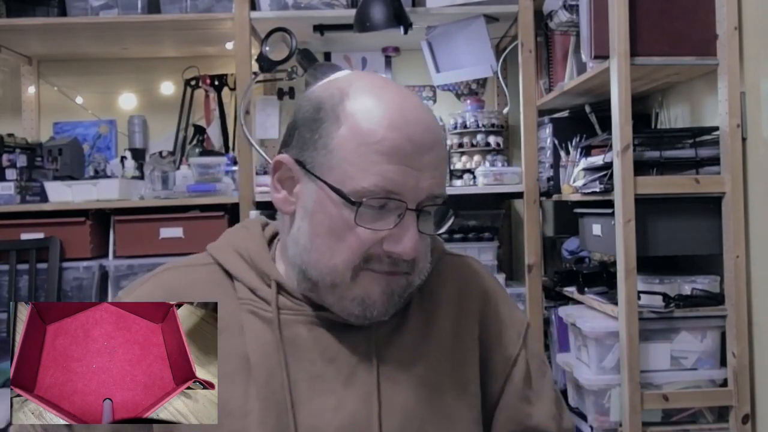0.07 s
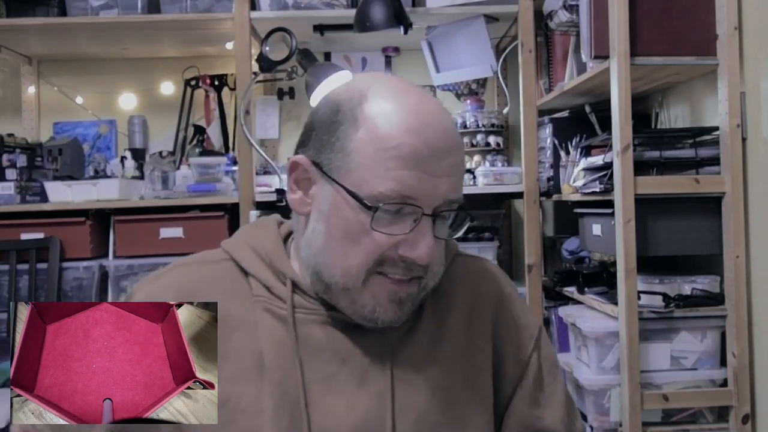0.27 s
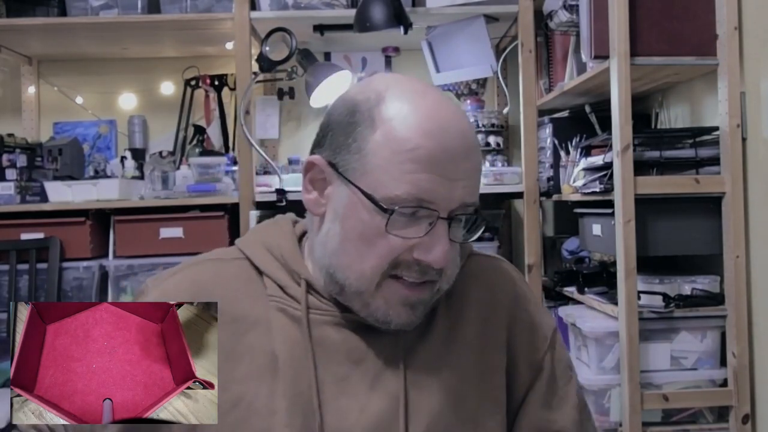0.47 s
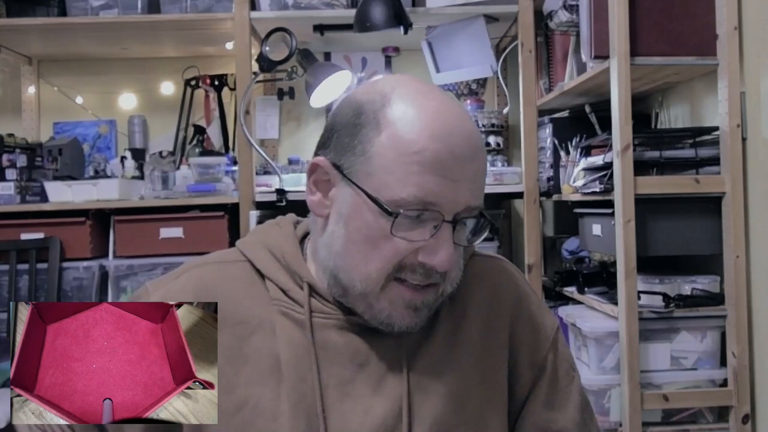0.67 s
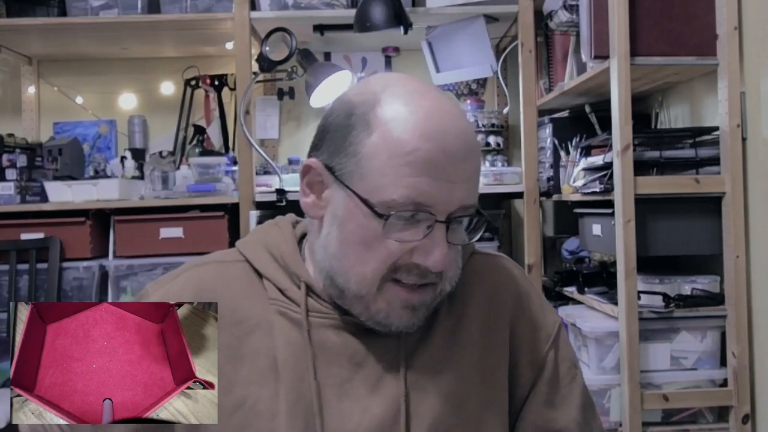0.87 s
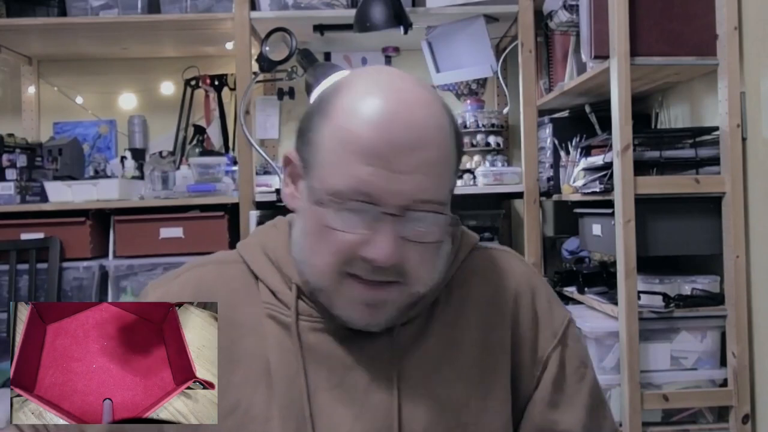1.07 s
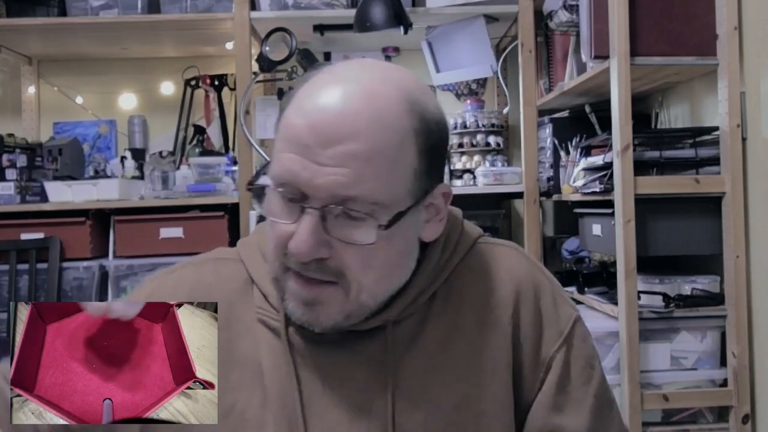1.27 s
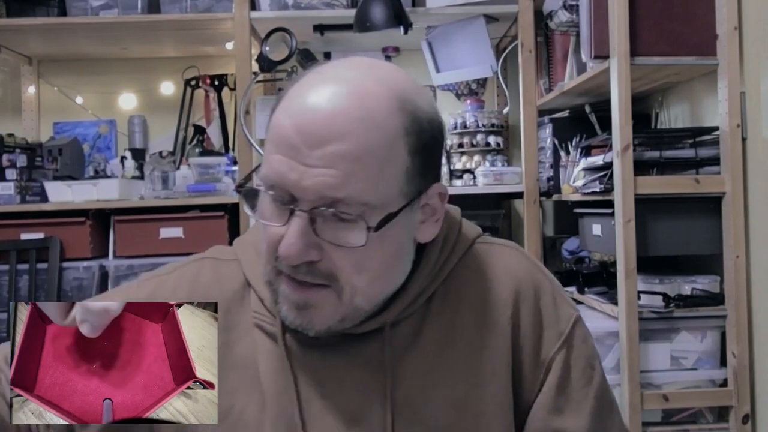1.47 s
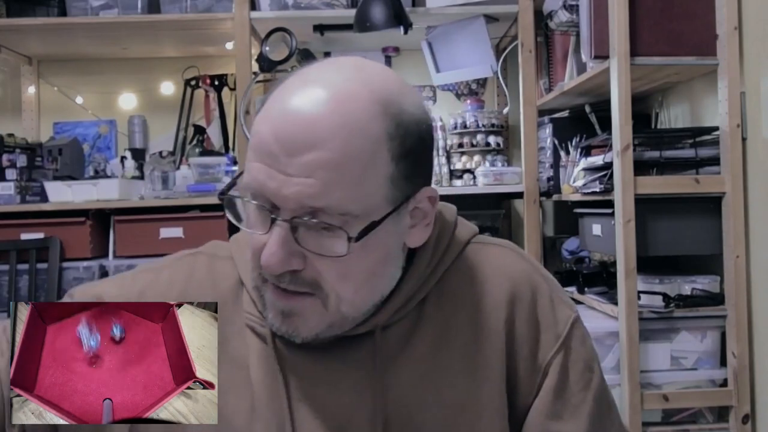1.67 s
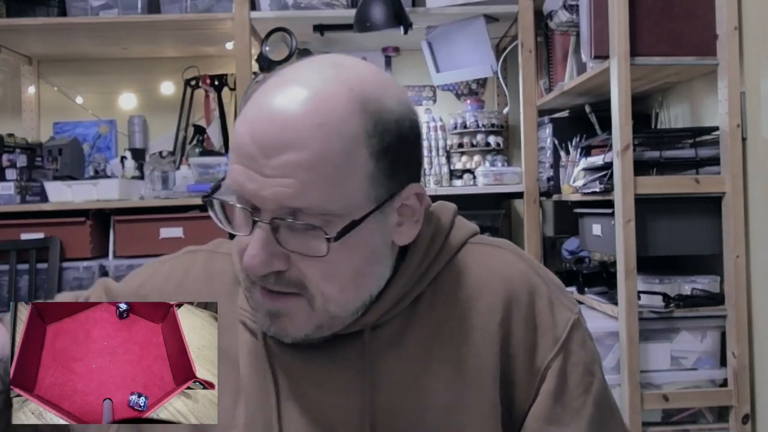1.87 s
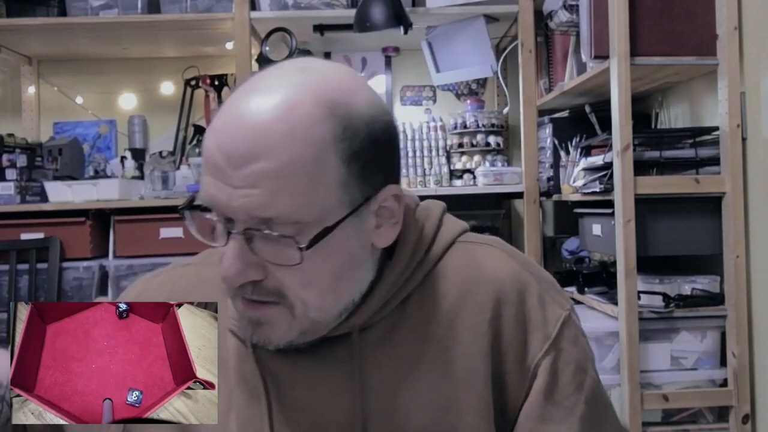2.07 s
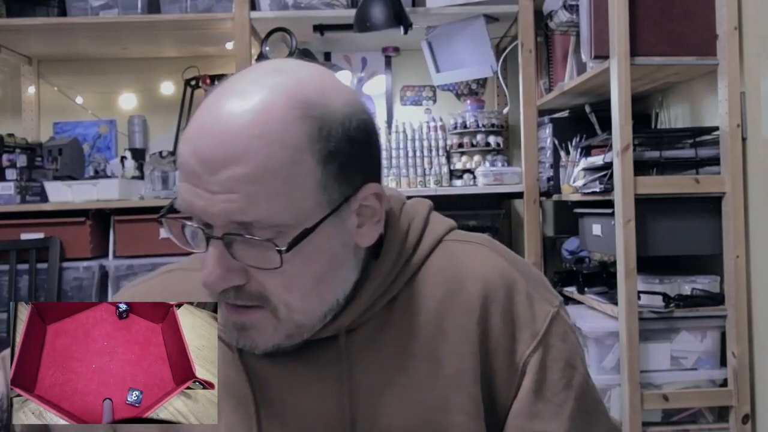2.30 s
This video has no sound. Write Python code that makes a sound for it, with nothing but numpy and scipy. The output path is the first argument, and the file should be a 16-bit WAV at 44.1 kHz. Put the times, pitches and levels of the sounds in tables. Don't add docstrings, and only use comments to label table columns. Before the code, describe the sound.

Two plastic dice clack in a cupped hand, then thud and tumble into a felt-lined tray

```python
import sys
import numpy as np
from scipy import signal
from scipy.fft import rfft, irfft
from scipy.io import wavfile

SR = 44100
rng = np.random.default_rng(int(sys.argv[2]) if len(sys.argv) > 2 else 0)


def ratio_of_db(decibels):
    return 10 ** (np.asarray(decibels, float) / 20)


def put_to_file(sound):
    columns = np.atleast_2d(sound).T
    safe = np.clip(columns, -1, 1)
    whole_steps = np.round(safe * 32767)
    wavfile.write(sys.argv[1], SR, whole_steps.astype(np.int16))


N = 103061
PAD = SR // 4

# pitch_hz, level_db, t60_s (time to fade by 60 dB)
DIE_MODES = [(1200, -25, 0.012), (2134, -8.5, 0.007), (2850, -15, 0.0052), (4000, -5, 0.0084),
             (4700, -7, 0.0044), (5630, -4, 0.0062), (6890, -3.5, 0.0074), (8160, -2.5, 0.0057),
             (9440, -0.5, 0.0055), (10520, -2.5, 0.0036), (11970, -1.5, 0.005), (14100, -9, 0.0032),
             (14950, -13, 0.0025)]
DIE_HARD_ABOVE_HZ, DIE_CONTACT_S = 7500, 0.00022


def dice():
    # start_s, peak_db, loudest_hz, palm_hollow_db, hardness_db (of the top notes)
    clacks = [(0.0832, -28, 3900, 9, -12), (0.1454, -21.5, 5500, 2.2, 1), (0.171, -21.5, 5740, 0.5, -2),
              (0.1868, -30, 4400, 6, 4.5), (0.265, -31, 4500, 10.5, -6), (0.2872, -20.5, 3620, 0.3, -16),
              (0.4712, -25, 4260, 9.2, -24), (0.4952, -17.5, 3730, 4.2, -18), (0.5691, -20, 4400, -1.5, -3),
              (0.5784, -19, 5800, -1.2, 2.5), (0.6083, -18.5, 4430, -3.2, -2.5),
              (0.7128, -17.5, 3630, -4.5, 3.5), (0.7842, -14, 6360, -1.7, -4.5),
              (0.9113, -20, 7050, 0.8, 1.5), (0.9916, -25, 5000, 1, 4.5), (1.001, -20, 5100, -1.2, 1.5),
              (1.1099, -19.5, 7500, 0.3, -3), (1.168, -17.5, 7200, -12, -3.5), (1.212, -25, 5100, 2, -3),
              (1.2613, -25.5, 4880, 4, -14), (1.3495, -31, 4000, 0.3, -3.5), (1.3767, -26, 3940, -18, 0.5),
              (1.6604, -30.5, 6620, -6, 10)]
    # start_s, peak_db, loudest_hz
    rebounds = [(0.0893, -21.5, 4000), (0.1095, -30, 4500), (0.1145, -38, 4000), (0.1404, -50, 5500),
                (.1502, -26, 5000), (0.189, -32, 5000), (0.2188, -37, 4000), (0.23, -33, 2430),
                (0.2937, -24.5, 4000), (0.3035, -43, 4000), (0.389, -31, 5000), (.3955, -41, 8500),
                (0.401, -36.5, 10500), (0.41, -41.5, 3800), (0.505, -33, 4000), (0.5204, -40, 4000),
                (0.6131, -27.5, 4500), (0.7213, -24.5, 5000), (0.791, -24.5, 6500), (.8049, -34, 3500),
                (.8088, -32, 4500), (0.948, -30, 5500), (1.1167, -30.5, 4000), (1.141, -39.5, 5000),
                (1.1745, -25.5, 6500), (1.1772, -23.5, 6800), (1.1922, -39, 6500), (1.3712, -38, 4100)]
    # start_s, peak_db, loudest_hz
    soft_ticks = [(1.4234, -36, 4100), (1.4711, -29, 4700), (1.509, -37, 4700), (1.5216, -37, 4440),
                  (1.5289, -41, 4700), (1.5508, -44.5, 4700)]
    # start_s, length_s, level_db, loudest_hz
    grinds = [
        (.951, .028, -31, 6000),
        (1.373, .02, -33, 4200),
        (1.178, .018, -33, 6800),
    ]
    rebound_palm_db, rebound_hard_db = -1.5, -3.5
    soft_palm_db, soft_hard_db = -4.5, -31
    grind_clicks_per_s, grind_trim_db = 4300, 5
    lag_s, trim_db = 0.001, -4.5

    blows = [(-0.025, -16.5, 5000, 0, 0)]
    blows += list(clacks)
    blows += [(0.384, -15, 4600, -2.5, 3), (0.3883, -25, 5300, -2.5, -6.0)]
    blows += [(*row, rebound_palm_db, rebound_hard_db) for row in rebounds]
    blows += [(*row, soft_palm_db, soft_hard_db) for row in soft_ticks]
    for start_s, length_s, level_db, loudest_hz in grinds:
        chance, size = rng.random((2, 80))
        gaps_s = -np.log(chance) / grind_clicks_per_s
        places = np.cumsum(gaps_s) / length_s
        for place, click_size in zip(places, size):
            if place < 1:
                swell = np.sqrt(place) * (1 - place)
                click_db = level_db + grind_trim_db + 20 * np.log10(swell * click_size)
                blows.append((start_s + length_s * place, click_db, loudest_hz, rebound_palm_db, rebound_hard_db))

    start_s, peak_db, loudest_hz, palm_db, hard_db = np.transpose(blows)
    ringing = strike(start_s + lag_s, peak_db + trim_db, loudest_hz, palm_db, 3300,
                     hard_db, DIE_HARD_ABOVE_HZ, DIE_MODES, DIE_CONTACT_S)
    low_cut = signal.butter(2, 1000, "high", fs=SR, output="sos")
    return signal.sosfilt(low_cut, ringing)


def tray():
    # start_s, peak_db, loudest_hz, hardness_db
    thuds = [
        (1.781, -14.5, 872, 6.5),
        (1.806, -14, 957, 1.5),
        (1.819, -32, 1220, 2),
        (1.833, -25.5, 528, -22),
        (1.864, -22, 920, 3),
        (1.886, -26, 266, 1),
        (1.93, -29.5, 366, -5),
        (1.956, -24.5, 910, -3.5),
        (1.972, -34.5, 361, -9),
        (2.072, -49, 357, -6),
    ]
    # pitch_hz, level_db, t60_s
    tray_modes = [(115.7, -21.5, 0.067), (169.3, -20, .12), (260, -14, 0.057), (352, -10.5, 0.056),
                  (497.5, -9, 0.044), (584, -9.5, 0.032), (695, -11.5, 0.025), (771, -8, 0.0324),
                  (850, -1.5, 0.016), (978, -4.5, 0.018), (1142, -2, 0.015), (1359, -11, 0.018),
                  (1780, -8.5, 0.0095), (2640, -16.5, 0.0037)]
    lag_s, thud_trim_db, tick_db = 0.0012, -5, -35.5

    start_s, peak_db, loudest_hz, hard_db = np.transpose(thuds)
    flat_db = 0 * start_s
    body = strike(start_s + lag_s, peak_db + thud_trim_db, loudest_hz, flat_db, 0,
                  hard_db, 1600, tray_modes, 0.00048)
    tick = strike(start_s + lag_s, peak_db + tick_db + hard_db, loudest_hz, flat_db, 0,
                  flat_db, DIE_HARD_ABOVE_HZ, DIE_MODES, DIE_CONTACT_S)
    felt_dulling = signal.butter(2, 6600, fs=SR, output="sos")
    return signal.sosfilt(felt_dulling, body) + tick


def strike(start_s, peak_db, loudest_hz, low_db, low_below_hz, hard_db, hard_above_hz, modes, contact_s):
    focus_db, focus_octaves = 5, 0.3
    scatter_db, detune_share = 2.0, 0.042
    longest_ring_cycles, hard_edge_octaves = 24, 0.3

    out = np.zeros(N + PAD + SR)
    t = np.arange(SR // 8) / SR
    hz, level_db, t60_s = np.transpose(modes)[:, :, None]
    t60_s = np.where(hz > hard_above_hz, np.minimum(t60_s, longest_ring_cycles / hz), t60_s)
    top_share = np.clip(1 + np.log2(hz / hard_above_hz) / hard_edge_octaves, 0, 1)
    soft_start = (1 - np.exp(-t / contact_s)) ** 2
    signs = (-1) ** np.arange(len(modes))[:, None]
    luck = rng.standard_normal((len(start_s), 2, len(modes), 1))
    for k in range(len(start_s)):
        octaves_away = np.log2(hz / loudest_hz[k])
        colour_db = focus_db * np.exp(-(octaves_away / focus_octaves) ** 2)
        colour_db = colour_db + scatter_db * luck[k, 0]
        colour_db = colour_db + low_db[k] * (hz < low_below_hz) + hard_db[k] * top_share
        loudness = ratio_of_db(peak_db[k] + level_db + colour_db - 60 * t / t60_s)
        tuned_hz = hz * (1 + detune_share * luck[k, 1])
        rings = loudness * np.sin(2 * np.pi * tuned_hz * t) * soft_start * signs
        i = int(start_s[k] * SR) + PAD
        out[i:i + len(t)] -= rings.sum(axis=0)
    return out[:N + PAD]


def sway():
    start_s, pitch_hz, peak_s, level_db = 1.7876, 34.7, 0.13, -30
    t = np.maximum(np.arange(N) / SR - start_s, 0)
    swell = t / peak_s * np.exp(1 - t / peak_s)
    return ratio_of_db(level_db) * swell * np.sin(2 * np.pi * pitch_hz * t)


def room(source):
    # pitch_hz, t60_s
    room_t60 = [(150, 0.61), (600, 0.32), (2000, 0.31), (5000, 0.29), (9000, 0.33), (15000, 0.25)]
    grain_db, grain_hz, rise_s = 2.5, 250, 0.0014
    t = np.arange(SR // 2) / SR
    edges_hz = 100 * 2 ** np.arange(0, 7.6, .5)
    echo = np.zeros(len(t))
    for low_hz, high_hz in zip(edges_hz, edges_hz[1:]):
        band_pass = signal.butter(2, [low_hz, high_hz], "band", fs=SR, output="sos")
        band = signal.sosfilt(band_pass, rng.standard_normal(len(t)))
        fade_db = -60 * t / at_hz(room_t60, np.sqrt(low_hz * high_hz))
        echo += band * ratio_of_db(grain_db * drift(grain_hz, count=len(t)) + fade_db)
    echo *= 1 - np.exp(-(t / rise_s) ** 2)
    echo /= np.sqrt(np.sum(echo ** 2))
    return signal.fftconvolve(source, echo)[:len(source)]


def air():
    # pitch_hz, level_db (per Hz)
    air_colour = [(70, -3.5), (150, -6.5), (400, -6), (800, -6.5), (1300, -4), (2200, -11.5), (5000, -23),
                  (15000, -33.5)]
    # pitch_hz, level_db (rms)
    fan = [
        (192, -72),
        (860, -70),
        (1137, -77),
        (1680, -79),
    ]
    hiss_db, rumble_db, rumble_low_hz, rumble_high_hz = -64, -66.5, 5.1, 48
    wobble_db, wobble_hz, wander_hz = 2.0, 8, 1.3

    hz = np.maximum(np.fft.rfftfreq(N, 1 / SR), 1)
    hiss_gain = ratio_of_db(at_hz(air_colour, hz)) * (hz > 40)
    rumble_gain = 1 / (1 + (hz / rumble_high_hz) ** 6) / (1 + (rumble_low_hz / hz) ** 4)
    out = ratio_of_db(hiss_db) * coloured_noise(hiss_gain) + ratio_of_db(rumble_db) * coloured_noise(rumble_gain)
    for pitch_hz, level_db in fan:
        turns = np.cumsum(pitch_hz + wander_hz * drift(wobble_hz, count=N)) / SR
        loudness = ratio_of_db(level_db + wobble_db * drift(wobble_hz, count=N))
        out += loudness * np.sqrt(2) * np.sin(2 * np.pi * turns)
    return out


def coloured_noise(gain):
    return rms_one(irfft(rfft(rng.standard_normal(N)) * gain, N))


def drift(rate_hz, count):
    r = np.exp(-2 * np.pi * rate_hz / SR)
    wander = signal.lfilter([1], [1, -2 * r, r * r], rng.standard_normal(count + SR))
    return rms_one(wander[SR:])


def at_hz(points, hz):
    table_hz, values = np.transpose(points)
    return np.interp(np.log(hz), np.log(table_hz), values)


def rms_one(x):
    return x / np.sqrt(np.mean(x ** 2) + 1e-20)


def scene():
    hand, felt = dice(), tray()
    other_side = dice()
    echo = room(ratio_of_db(-12.5) * (hand + other_side) + ratio_of_db(-9) * felt)
    near = hand + felt + echo
    return (near[PAD:] + sway() + air())[None]


def top_cut(x):
    return signal.sosfilt(signal.butter(12, 16730, fs=SR, output="sos"), x)


def record(dry):
    fade_s = 0.02
    fade = np.clip((N - np.arange(N)) / SR / fade_s, 0, 1)
    return top_cut(dry * fade)


dry = scene()
out = record(dry)
put_to_file(out)
```